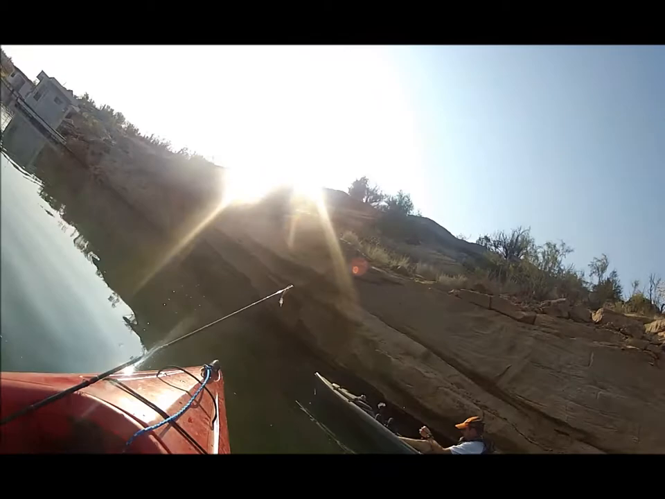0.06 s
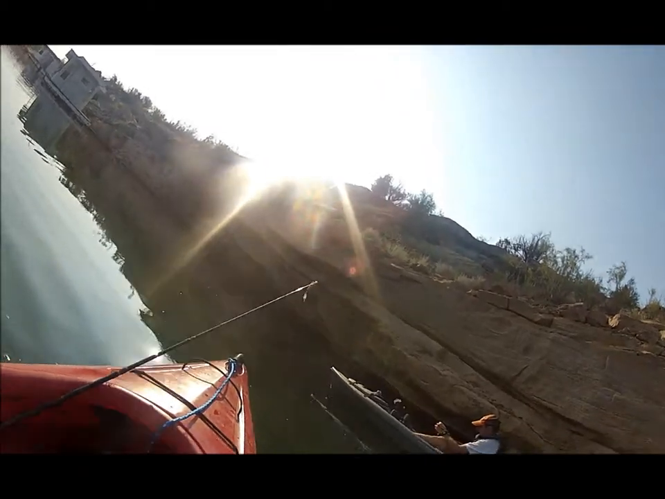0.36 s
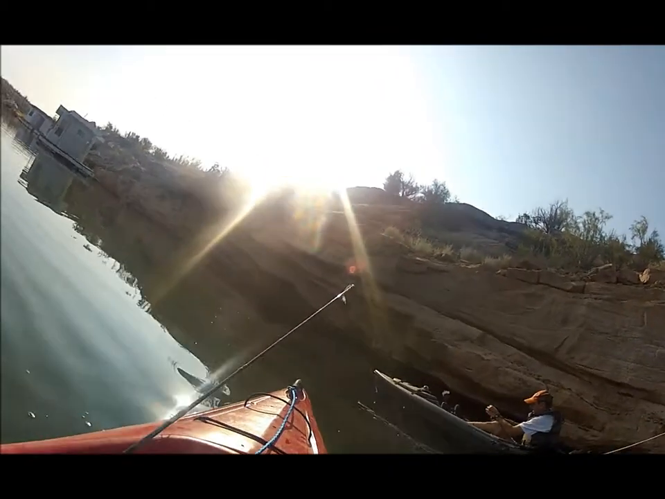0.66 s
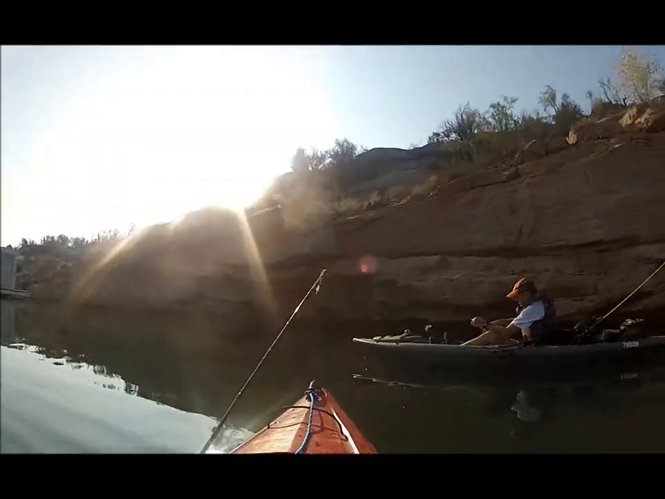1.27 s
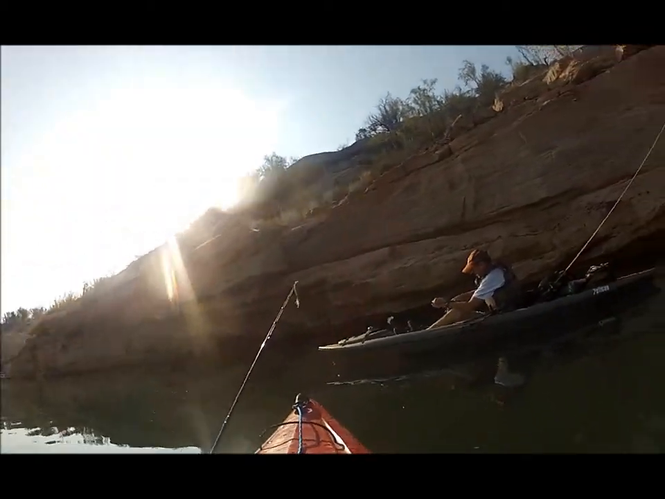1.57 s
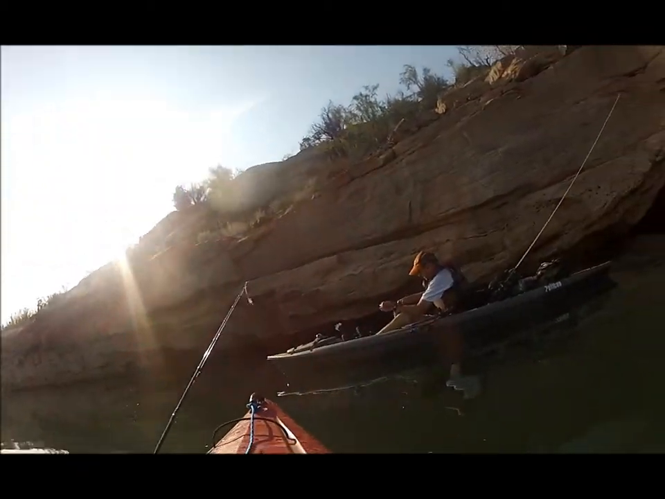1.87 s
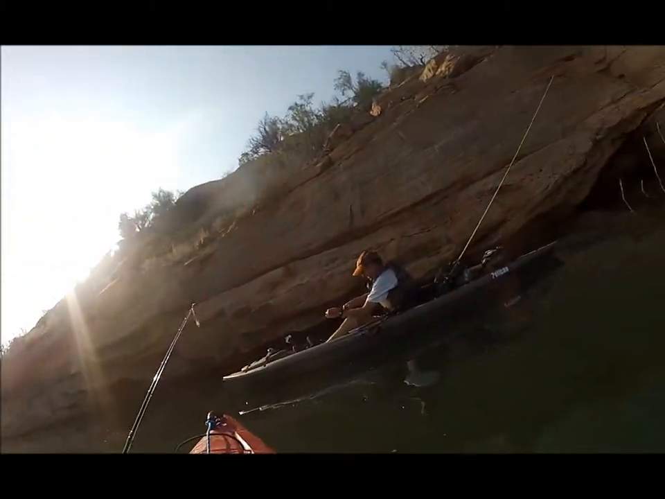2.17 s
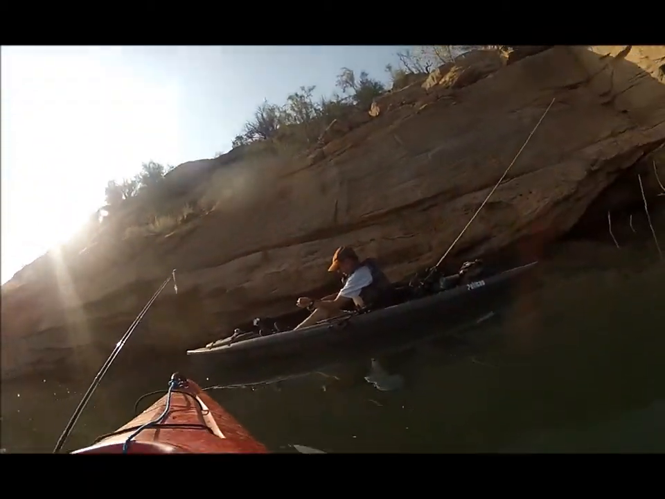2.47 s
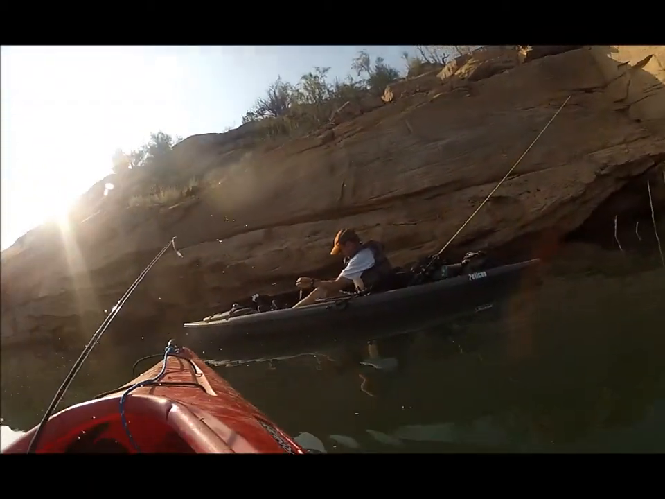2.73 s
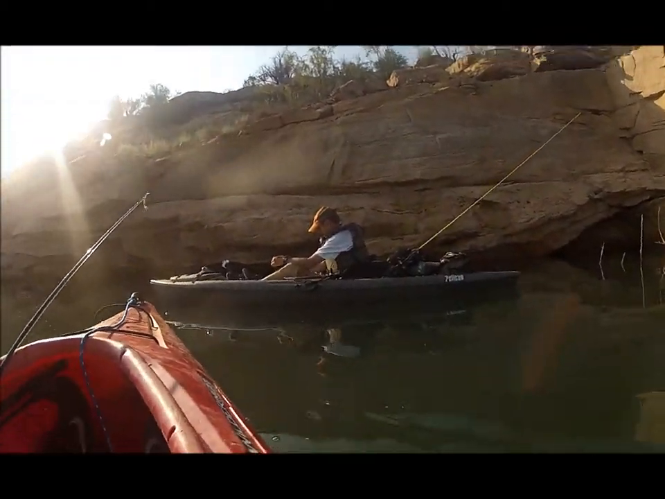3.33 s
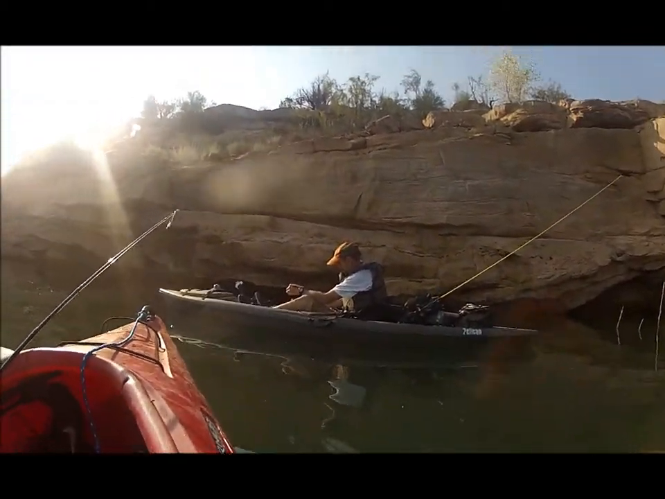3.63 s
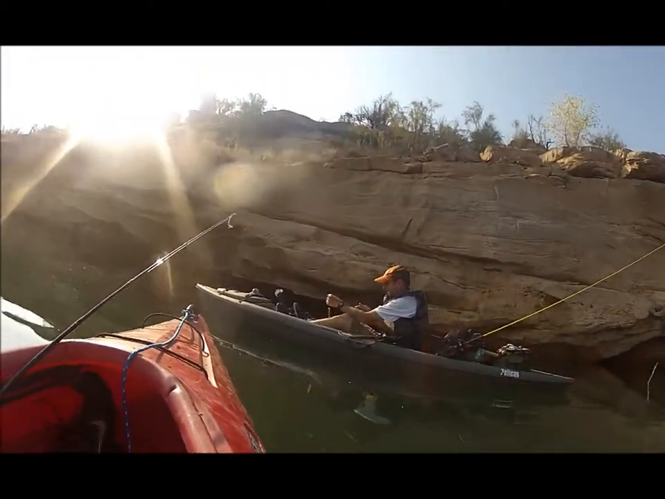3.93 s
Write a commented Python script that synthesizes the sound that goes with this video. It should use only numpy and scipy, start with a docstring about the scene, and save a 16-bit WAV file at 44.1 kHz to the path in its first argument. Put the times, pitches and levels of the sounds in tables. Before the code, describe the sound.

A kayak paddle is heard close up, over faint lapping and a light breeze. After a few light taps, a stroke gulps, drips and splashes softly from about 0.5 to 1.7 seconds. At 1.9 seconds the paddle knocks hard on the hollow plastic deck, then scrapes faintly along it over a low hull rumble. Another sharp knock comes near 2.9 seconds, and a cluster of loud bumps around 3.5 to 3.8.

```python
"""Kayak on a calm lake

Heard up close from a camera microphone mounted on the plastic hull. Small waves lap throughout.
A paddle stroke gulps, drips and splashes; then the paddle knocks down on the deck, slides along it
and bumps about. The camera samples coarsely, which mirrors the sound faintly into the treble."""
import sys
import numpy as np
from scipy import signal
from scipy.fft import rfft, irfft, next_fast_len
from scipy.io import wavfile
from scipy.ndimage import map_coordinates

SR = 44100
rng = np.random.default_rng(int(sys.argv[2]) if len(sys.argv) > 2 else 0)


def bounce(signal):
    """Save signal as a 16-bit WAV file at the path given by the first command-line argument."""
    frames = np.transpose(np.atleast_2d(signal))
    limited = np.clip(frames, -1, 1)
    pcm = np.round(limited * 32767).astype(np.int16)
    wavfile.write(sys.argv[1], SR, pcm)


N = 176400

# Table levels are relative: each source applies its own gain.
# faint breeze over the lake (frequency [Hz], level [dB])
BREEZE_COLOUR = [(20, -12), (100, -20), (600, -4.5), (1100, -19), (2600, -18), (5000, -20.5)]
# hull rumble under the microphone (time [s], level [dB])
RUMBLE_LEVEL = [(0.0, -44), (0.27, -59.5), (0.5, -50.5), (0.72, -47.5), (0.95, -51.5), (1.2, -62.5),
                (1.4, -48.5), (1.55, -46.5), (1.7, -40), (1.78, -58), (1.87, -58), (2.06, -37.5),
                (2.3, -38.5), (2.48, -33.5), (2.63, -43), (2.8, -37), (2.95, -39), (3.15, -36.5),
                (3.29, -45.5), (3.45, -51), (3.6, -40), (3.75, -29), (3.83, -33), (3.9, -43.5),
                (4.0, -56.5)]
# spectrum of the rumble (frequency [Hz], level [dB])
RUMBLE_COLOUR = [(15, -31), (43, -16), (81, -1.5), (170, -0.5), (213, 1), (253, -9.5), (305, -4),
                 (367, -10.5), (436, -12.5), (512, -22.5), (600, -15.5), (780, -51), (1320, -120)]
# small waves around the boat (time [s], level [dB])
LAP_LEVEL = [(0.0, -53), (0.43, -61), (1.06, -55.5), (1.2, -45.5), (1.36, -47), (1.51, -49), (1.69, -54),
             (1.89, -72.5), (2.07, -55.5), (2.81, -54.5), (2.96, -52), (3.04, -47), (3.17, -49.5),
             (3.32, -52.5), (3.55, -62.5), (3.69, -49), (3.84, -59.5), (4.0, -64.5)]
# spectrum of slapping water (frequency [Hz], level [dB])
LAP_COLOUR = [(150, -9.5), (350, -6), (650, 5), (880, -0.5), (1100, -12), (1600, -16), (3000, -50)]
# thin whirr during the slide (centre [Hz], width [Hz], level [dB])
WHIRR_BANDS = [(2760, 180, -65.5), (5180, 210, -72.5)]
# swell of the whirr (time [s], level [dB])
WHIRR_LEVEL = [(2.05, -26), (2.27, -1.5), (2.85, -6), (3.05, 0), (3.2, -3)]
# gritty swishes: rustles on board and one water splat (time [s], length [s], level [dB], centre [Hz])
SWISHES = [(0.0, 0.094, -58, 3490), (1.306, 0.0074, -46, 3740), (3.065, 0.013, -50, 2470),
           (3.087, 0.014, -46, 2500), (3.113, 0.031, -51.5, 2600), (3.534, 0.097, -59, 2600)]
# small ticks of tackle (time [s], level [dB])
TICKS = [(2.036, -49), (2.108, -49), (2.172, -54), (2.48, -50), (2.716, -53.5)]
# spectrum of a tick (frequency [Hz], level [dB])
TICK_COLOUR = [(1000, -20), (2000, 12), (2600, 13), (3200, -3), (4100, 7.5), (4900, -8), (5800, -5)]
# droplets falling while the blade is lifted (time [s], level [dB])
TRICKLE_LEVEL = [(0.95, -68), (1.3, -58.5), (1.6, -58.5), (1.75, -75)]
# spray beside the boat (time [s], level [dB])
SPRAY_LEVEL = [(0.0, -62), (0.1, -58.5), (0.22, -69.5), (0.55, -66), (0.85, -66), (1.066, -74.5),
               (1.208, -61.5), (1.4, -52.5), (1.52, -53), (1.656, -60), (1.71, -68), (1.87, -73)]
# spectrum of spray and splats (frequency [Hz], level [dB])
SPRAY_COLOUR = [(530, -32), (900, 0), (1100, -6.5), (1900, -6.5), (2530, 1.5), (3040, -10.5), (4200, -9),
                (5000, -38.5), (5600, -15), (12300, -120)]
# air pockets closing under the blade (time [s], level [dB], pitch [Hz], t60 [s], rise [octaves/s])
GULPS = [(.549, -37, 754, 0.081, -8), (.568, -42.5, 659, 0.16, 2.5), (1.02, -47, 696, 0.27, -4),
         (1.078, -35, 500, 0.045, -5), (1.088, -39.5, 388, 0.085, 1.5), (1.115, -27, 306, 0.038, 12),
         (1.133, -29.5, 700, 0.022, 21), (1.147, -28.5, 870, 0.032, 2), (1.243, -34.5, 790, 0.093, -13.5),
         (1.253, -33.5, 425, 0.07, 2.5), (1.292, -27, 477, 0.047, 7.5), (1.315, -39, 800, 0.075, -5.5),
         (3.252, -33.5, 863, 0.024, 21)]
# drops off the blade (time [s], level [dB], pitch [Hz])
DRIPS = [(0.2958, -34, 2020), (0.967, -41, 1760), (0.978, -38.5, 1170), (0.9783, -41, 3350),
         (1.0052, -33, 1950), (1.0153, -37.5, 2000), (1.0959, -34.5, 2320), (1.1118, -36.5, 3100),
         (1.182, -39, 3470), (1.215, -42, 3650), (1.245, -43, 2240), (1.262, -42, 4030), (1.275, -33, 1850),
         (1.2757, -34, 3200), (1.3078, -27, 3690), (1.339, -35.5, 2090), (1.369, -33, 2450),
         (1.419, -35, 2440), (1.4591, -33, 2440), (1.545, -48, 4700), (1.591, -49, 4750),
         (1.6405, -26, 1940), (1.6596, -33.5, 2370), (1.69, -48, 4600), (1.797, -47.5, 4600),
         (1.838, -54, 4330), (2.9394, -35, 2790)]
# shaft scraping along the deck (time [s], level [dB])
SLIDE_LEVEL = [(2.05, -58), (2.092, -60.5), (2.576, -58.5), (2.788, -55), (2.95, -51.5), (3.054, -55),
               (3.162, -53), (3.352, -60.5), (3.602, -72.5), (3.744, -66.5), (3.88, -61.5), (4.0, -70)]
# spectrum of the scraping (frequency [Hz], level [dB])
SLIDE_COLOUR = [(530, -33), (900, 0.5), (1100, -8.5), (1350, -1.5), (2500, -1.5), (2900, -3.5),
                (3590, -16.5), (3910, -5.5), (4190, -12), (5190, -21.5), (5600, -17), (7280, -44),
                (12300, -120)]
# low modes of the hull shell (frequency [Hz], level [dB], t60 [s])
HULL_MODES = [(67, -13.5, 0.63), (81.8, -13, 0.41), (105, -7, 0.58), (134.3, -13.5, 0.66),
              (168.5, -6.5, 0.34), (200.7, 1.5, 0.23), (252.7, -5, 0.12)]
# dense ringing of the hull (frequency [Hz], level [dB])
HULL_COLOUR = [(30, -43), (65, -40), (110, -12), (220, -11), (330, -27.5), (700, -91)]
# modes of the deck panels (frequency [Hz], level [dB], t60 [s])
DECK_MODES = [(304.5, 3, 0.15), (371, 5.5, 0.15), (420, 4, 0.21), (466, 4, 0.17), (600, 5.5, 0.12),
              (771, 2, 0.038), (929, -7, 0.06)]
# dense ringing of the panels (frequency [Hz], level [dB])
DECK_COLOUR = [(150, -73), (290, -5.5), (480, 3.5), (780, -11.5), (1050, -25), (1600, -26), (3000, -45.5)]
# modes of the paddle shaft (frequency [Hz], level [dB], t60 [s])
SHAFT_MODES = [(1130, -10, .04), (1710, -3, .035), (1793, -1, .045), (1922, 0, .035), (2083, -6, .05),
               (2400, -9, .03), (2595, -8, .05), (2794, -12, .06)]
# dense ringing of the shaft (frequency [Hz], level [dB])
SHAFT_COLOUR = [(400, 2.5), (800, 5), (1300, -10.5), (1650, 1), (1950, -4), (2250, -5), (2650, -6),
                (3100, -23), (5000, -44)]
# crack of a hard contact (frequency [Hz], level [dB])
CRACK_COLOUR = [(590, -21), (1000, -8), (1450, -6), (1730, -41), (2130, -4.5), (2360, -10), (2670, 3),
                (3310, -13), (3610, -4.5), (4200, -6.5), (4710, -20), (5250, -24.5), (5600, -15),
                (7280, -46), (12300, -120)]
# soft bumps against the hull (time [s], push [dB], boom [dB], clack [dB])
BUMPS = [(0.072, -34, -34, -38.5), (0.084, -43, -28.5, -45), (1.515, -31, -32, -45),
         (1.565, -30.5, -30, -42), (1.627, -28.5, -30.5, -63), (2.457, -26, -26.5, -29),
         (2.954, -31, -29.5, -43), (3.135, -29, -26, -52), (3.49, -47, -32.5, -38),
         (3.5439, -21.5, -33.5, -30), (3.576, -30, -40, -30.5), (3.613, -26.5, -47, -38),
         (3.6297, -14.5, -24, -38), (3.641, -14, -30.5, -21.5), (3.653, -22, -30, -23),
         (3.7225, -17, -29, -20.5), (3.7288, -18.5, -23, -26.5), (3.7726, -32, -32, -27)]
# hard knocks on the deck (time [s], crack [dB], shaft ring [dB], boom [dB], clack [dB])
KNOCKS = [(0.193, -50, -53.5, -60, -54), (0.2457, -36, -48.5, -66, -43.5), (0.255, -37, -50, -43.5, -62),
          (0.686, -32, -60, -43.5, -41.5), (1.8816, -21.5, -26, -15.5, -18.5),
          (1.9501, -33, -31.5, -18.5, -24), (2.004, -62, -45.5, -29.5, -31.5),
          (2.8609, -22.5, -38.5, -31.5, -23.5), (2.865, -22.5, -47, -33, -30.5),
          (3.643, -36, -69, -25.5, -27), (3.691, -31, -47.5, -46, -31.5), (3.7554, -55, -48, -34.5, -28),
          (3.772, -44, -56, -44, -36)]


def amp(db):
    """Decibels to gain."""
    return 10 ** (np.asarray(db) / 20)


def unit(x):
    """Scale to rms 1."""
    return x / np.sqrt(np.mean(x ** 2) + 1e-20)


def level(rows):
    """Gain per sample of a (time [s], level [dB]) curve, fading out beyond its ends."""
    s, db = np.transpose(rows)
    t = np.arange(N) / SR
    return amp(np.interp(t, s, db) - 300 * np.abs(t - np.clip(t, s[0], s[-1])))


def wobble(rate):
    """A smooth random curve through rate points a second."""
    return map_coordinates(rng.standard_normal(int(N * rate / SR) + 4), [np.arange(N) * rate / SR])


def filtered(x, response):
    """Filter x by a gain that is a function of frequency."""
    size = next_fast_len(len(x) + 8192)
    return irfft(rfft(x, size) * response(np.fft.rfftfreq(size, 1 / SR)), size)[:len(x)]


def coloured(x, colour):
    """Shape x by (frequency [Hz], level [dB]) points on a log axis, at rms 1."""
    hz, db = np.transpose(colour)
    return unit(filtered(x, lambda f: amp(np.interp(np.log(f + 1), np.log(hz + 1), db))))


def noise(samples, colour):
    """Coloured noise at rms 1."""
    return coloured(rng.standard_normal(samples), colour)


def add(out, s, x):
    """Mix x into out at time s."""
    i = max(0, round(s * SR))
    out[i:i + len(x)] += x[:max(0, len(out) - i)]


def bubble(t, hz, t60, rise):
    """Trapped air rings as a damped sine that starts softly and glides by rise octaves a second."""
    phase = 2 * np.pi * np.cumsum(hz * 2 ** (rise * np.minimum(t, t60)), axis=-1) / SR
    return np.sin(phase) * amp(-60 * t / t60) * (1 - np.exp(-t * hz)) ** 2


def bubbles(count, low_hz, high_hz, cycles, max_rise, spread_db):
    """A cloud of bubbles of random time, pitch, strength and glide, at rms 1."""
    onset, pitch, strength, glide = np.hsplit(rng.random((count, 4)), 4)
    hz = low_hz * (high_hz / low_hz) ** pitch
    t = np.arange(SR // 20) / SR
    grains = amp(spread_db * strength) * bubble(t, hz, cycles / hz, max_rise * glide)
    at = (onset * N).astype(int) + np.arange(len(t))
    return unit(np.bincount(at.ravel(), grains.ravel(), N)[:N])


def ring(t, modes, colour, dense_db, dense_t60, attack_s):
    """Struck modes, a little different each blow, over dense ringing; rms 1 in the first 25 ms."""
    tones = np.zeros(len(t))
    for k, (hz, db, t60) in enumerate(modes):
        decay = amp(db + rng.normal(0, 1.2) - 60 * t / t60)
        detune = 1 + rng.normal(0, 0.003)
        tones += (-1) ** k * decay * np.sin(2 * np.pi * hz * detune * t)
    dense = noise(len(t), colour) * amp(dense_db - 60 * t / dense_t60)
    struck = (tones + dense) * (1 - np.exp(-t / attack_s))
    return struck / np.std(struck[:SR // 40])


def breeze():
    """Air over the open lake, a faint steady bed."""
    return amp(-65) * noise(N, BREEZE_COLOUR)


def rumble():
    """Water and rubbing keep the hollow hull rumbling under the microphone."""
    return amp(-1 + 0.87 * wobble(22.095)) * level(RUMBLE_LEVEL) * noise(N, RUMBLE_COLOUR)


def lapping():
    """Small waves close by: a wash with larger bubbles plopping in it."""
    plops = bubbles(count=420, low_hz=338.4, high_hz=1135, cycles=38, max_rise=13.4, spread_db=8.5)
    wash = amp(11.5) * rng.standard_normal(N)
    return amp(-0.5) * level(LAP_LEVEL) * coloured(plops + wash, LAP_COLOUR)


def whirr():
    """Narrow bands of noise sing faintly over the scraping."""
    out = np.zeros(N)
    for hz, width, db in WHIRR_BANDS:
        band = filtered(rng.standard_normal(N), lambda f: 1 / (1 + (2 * (f - hz) / width) ** 2))
        out += amp(db) * unit(band)
    return level(WHIRR_LEVEL) * out


def swishes(attack_s=0.0027, t60=0.027, width_octaves=0.97):
    """Brief swishes of gritty noise: rustles on board and one water splat."""
    out, t = np.zeros(N), np.arange(SR // 4) / SR
    for s, length, db, hz in SWISHES:
        grit = rng.standard_normal(len(t)) * amp(1.8 * wobble(384)[:len(t)])
        band = unit(filtered(grit, lambda f: 1 / (1 + (np.log2((f + 1) / hz) / width_octaves) ** 2) ** 2))
        envelope = (1 - np.exp(-t / attack_s)) * amp(db - 60 * np.maximum(t - length, 0) / t60)
        add(out, s, band * envelope)
    return out


def ticks(t60=0.013):
    """Bits of tackle tap with a bright tick that dies at once."""
    out, t = np.zeros(N), np.arange(SR // 4) / SR
    for s, db in TICKS:
        add(out, s, noise(len(t), TICK_COLOUR) * amp(db + 2.5 - 60 * t / t60))
    return out


def trickle():
    """Small droplets chirp as they hit the lake; the finest ones crackle in the spray."""
    drops = bubbles(count=900, low_hz=1500, high_hz=4300, cycles=26, max_rise=26, spread_db=12)
    crackle = bubbles(count=1300, low_hz=3500, high_hz=5400, cycles=7, max_rise=20, spread_db=16)
    return level(TRICKLE_LEVEL) * drops + amp(-14.5) * level(SPRAY_LEVEL) * crackle


def spray():
    """Tiny bubbles and spatter beside the boat: bubbly when loud, a smooth wash when quiet."""
    strength = level(SPRAY_LEVEL)
    fizz = bubbles(count=1700, low_hz=1100, high_hz=4400, cycles=12, max_rise=18, spread_db=26)
    spatter = amp(-8) * unit(rng.standard_normal(N) * amp(5 * wobble(260)))
    bubbly_share = strength / (strength + amp(-62))
    froth = np.sqrt(bubbly_share) * coloured(fizz + spatter, SPRAY_COLOUR)
    wash = np.sqrt(1 - bubbly_share) * noise(N, SPRAY_COLOUR)
    return amp(1.5) * strength * (froth + wash)


def drips(splat_t60=0.075):
    """Drops off the blade splat on the lake and ring as rising bubbles."""
    out, t = np.zeros(N), np.arange(SR // 4) / SR
    for s, db, hz in DRIPS:
        splat = noise(len(t), SPRAY_COLOUR) * amp(-14.5 - 60 * t / splat_t60)
        add(out, s, amp(db - 3.5) * (bubble(t, hz, t60=0.023, rise=9.8) + splat))
    return out


def gulps(slap_t60=0.052):
    """A paddle's reach away, air pockets slap shut under the blade and ring as big bubbles."""
    out, t = np.zeros(N), np.arange(SR // 4) / SR
    for s, db, hz, t60, rise in GULPS:
        slap = noise(len(t), LAP_COLOUR) * amp(-10 - 60 * t / slap_t60) * (1 - np.exp(-t * hz))
        add(out, s, amp(db + 2.5) * (bubble(t, hz, t60, rise) + slap))
    return out


def slide():
    """The shaft scrapes over the deck in tiny slips."""
    slips = rng.standard_normal(N) * amp(2.4 * wobble(160) + 0.35 * wobble(26.08))
    return amp(-1.5) * level(SLIDE_LEVEL) * coloured(slips, SLIDE_COLOUR)


def bumps(push_hz=231.5, push_t60=0.0061, band_hz=(65, 854)):
    """Soft contacts push a panel in, then ring hull and deck in a low band, without a crack."""
    out, t = np.zeros(N), np.arange(SR * 3 // 5) / SR
    swing = np.sin(2 * np.pi * push_hz * t) * amp(-60 * t / push_t60) * (1 - np.exp(-t * push_hz)) ** 2
    push = np.gradient(swing)
    push /= np.abs(push).max()
    for s, push_db, boom_db, clack_db in BUMPS:
        boom = ring(t, HULL_MODES, HULL_COLOUR, dense_db=-1, dense_t60=0.089, attack_s=0.0012)
        boom *= amp(-60 * t / 1.2)  # extra damping
        clack = ring(t, DECK_MODES, DECK_COLOUR, dense_db=11, dense_t60=0.046, attack_s=0.003)
        add(out, s, amp(push_db) * push + amp(boom_db - 6) * boom + amp(clack_db - 10) * clack)
    return signal.sosfilt(signal.butter(4, band_hz, "band", fs=SR, output="sos"), out)


def knocks(crack_t60=0.023, tail_t60=0.14):
    """Hard contacts near the microphone crack, ring the shaft, clack the deck and boom in the hull."""
    out, t = np.zeros(N), np.arange(SR * 3 // 5) / SR
    for s, crack_db, shaft_db, boom_db, clack_db in KNOCKS:
        shaft = ring(t, SHAFT_MODES, SHAFT_COLOUR, dense_db=7, dense_t60=0.05, attack_s=0.0002)
        crack = noise(len(t), CRACK_COLOUR) * (amp(-60 * t / crack_t60) + amp(-24 - 60 * t / tail_t60))
        boom = ring(t, HULL_MODES, HULL_COLOUR, dense_db=-6.5, dense_t60=0.26, attack_s=0.00072)
        clack = ring(t, DECK_MODES, DECK_COLOUR, dense_db=7, dense_t60=0.15, attack_s=0.0023)
        add(out, s, amp(shaft_db - 3) * shaft + amp(crack_db - 9.5) * crack)
        add(out, s, amp(boom_db - 1) * boom + amp(clack_db - 5) * clack)
    return out


def scene():
    """Paddle, water and boat over a faint breeze, in mono at the hull."""
    impacts = knocks() + bumps()
    water = gulps() + drips() + spray() + lapping() + trickle()
    small_sounds = slide() + whirr() + swishes() + ticks()
    return (impacts + water + small_sounds + rumble() + breeze())[None]


def record(dry, cutoff_hz=5450, hold_hz=12000, top_hz=16200):
    """The camera keeps the band under half its hold rate; holding samples mirrors it around the rate."""
    base = filtered(dry[0], lambda hz: 1 / np.sqrt(1 + (hz / cutoff_hz) ** 44))

    def mirror_gain(hz):
        """The mirror image has a null at the hold rate and falls steeply in the top treble."""
        droop = np.abs(hz - hold_hz) / np.maximum(hz, hold_hz / 2)
        return amp(0.53) * droop / np.sqrt(1 + (hz / 15100) ** 80)

    mirror = 2 * base * np.cos(2 * np.pi * hold_hz * np.arange(N) / SR)
    return filtered(base + filtered(mirror, mirror_gain), lambda hz: hz < top_hz)[None]


dry = scene()
out = record(dry)
bounce(out)
```